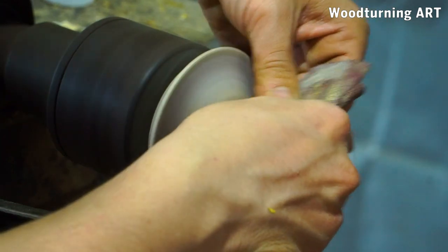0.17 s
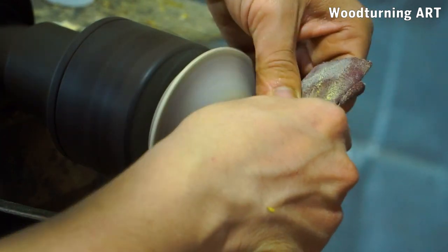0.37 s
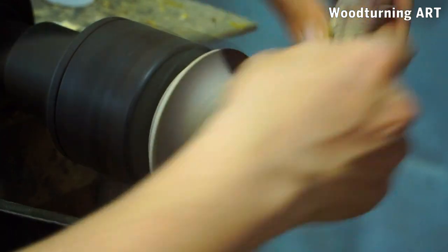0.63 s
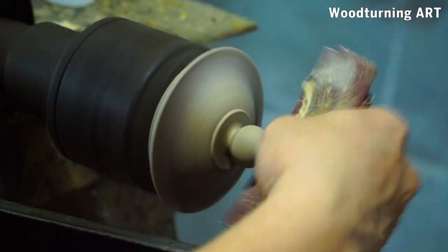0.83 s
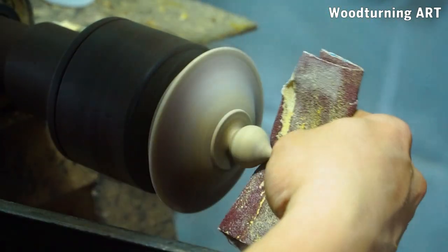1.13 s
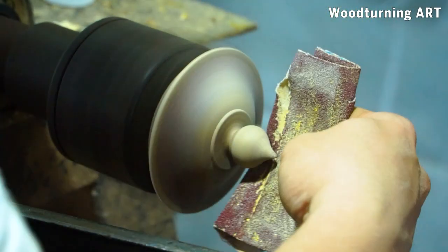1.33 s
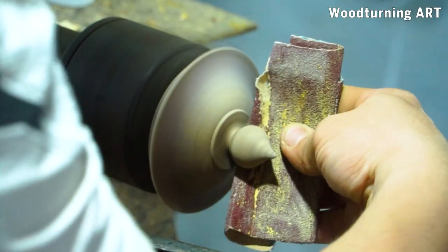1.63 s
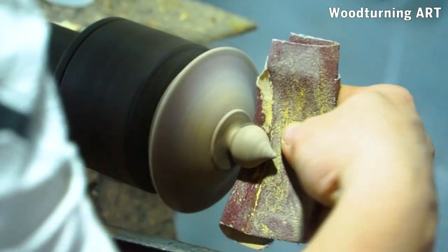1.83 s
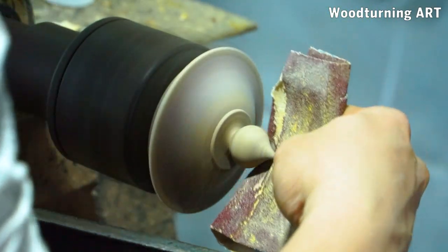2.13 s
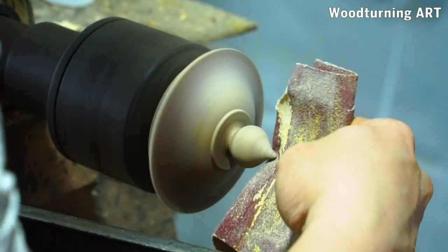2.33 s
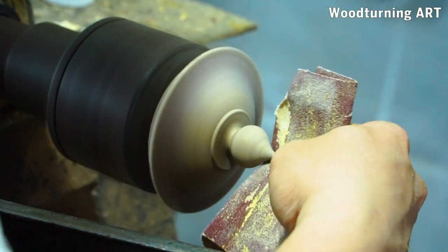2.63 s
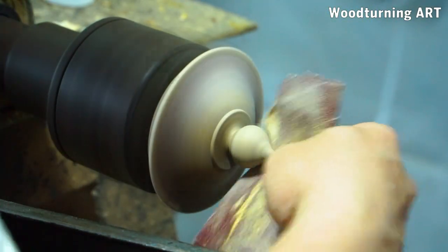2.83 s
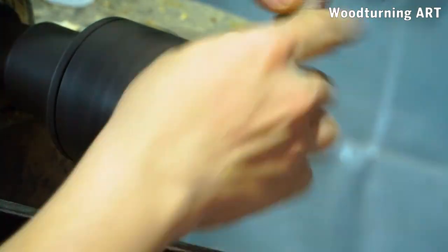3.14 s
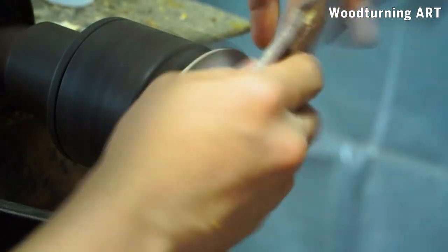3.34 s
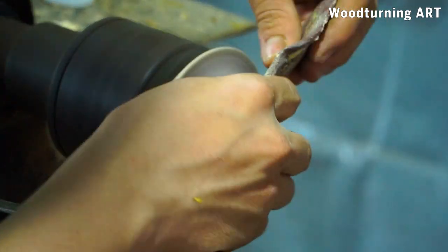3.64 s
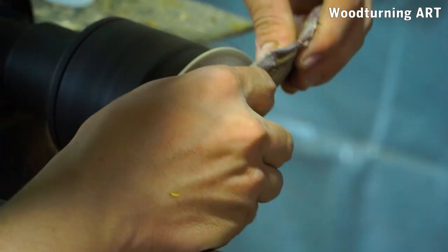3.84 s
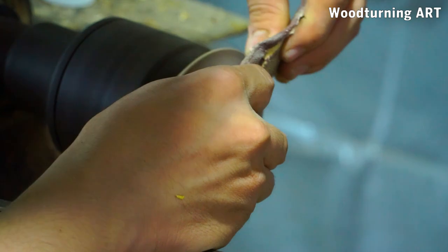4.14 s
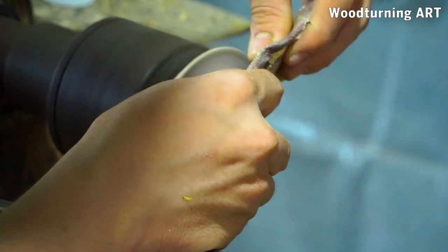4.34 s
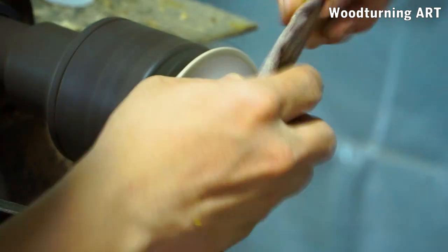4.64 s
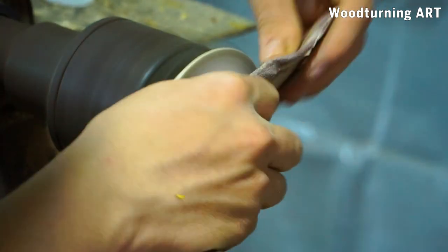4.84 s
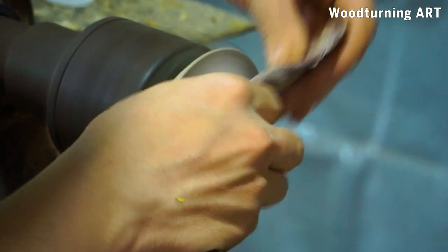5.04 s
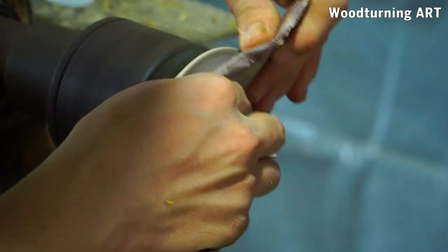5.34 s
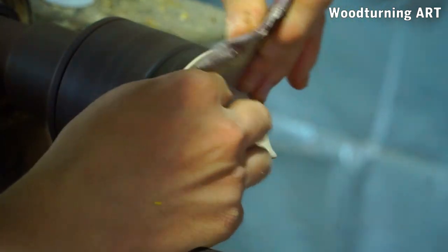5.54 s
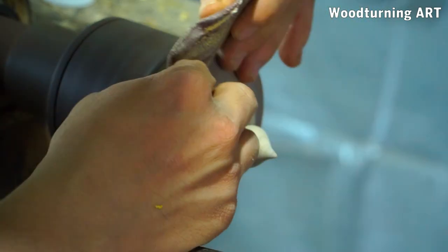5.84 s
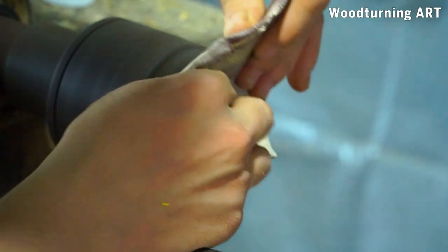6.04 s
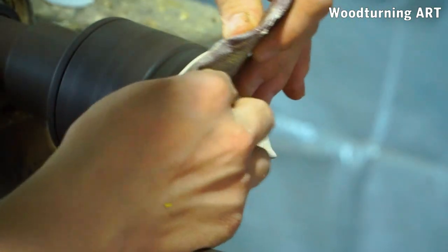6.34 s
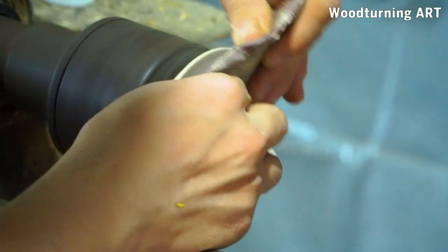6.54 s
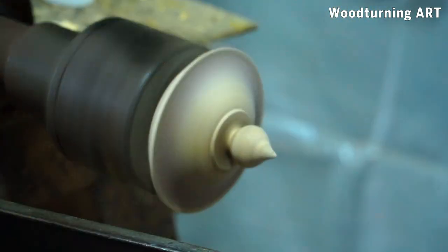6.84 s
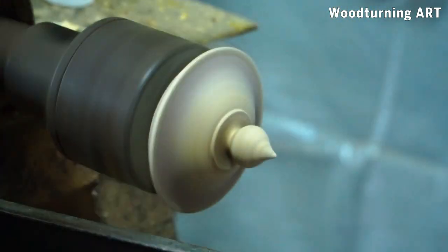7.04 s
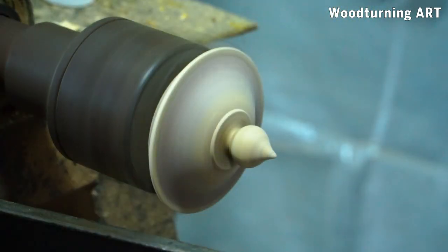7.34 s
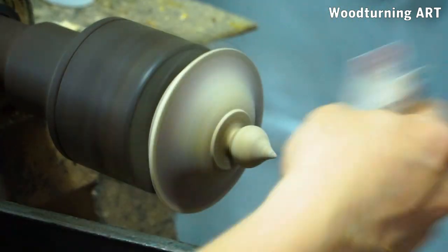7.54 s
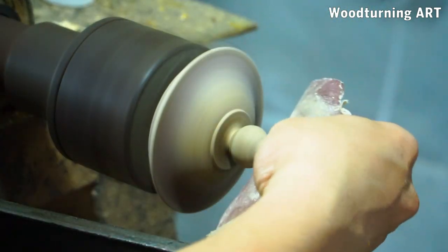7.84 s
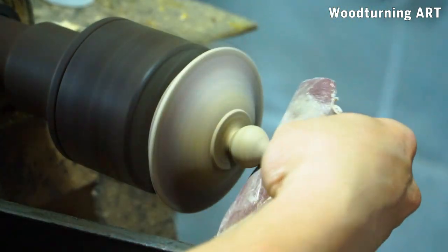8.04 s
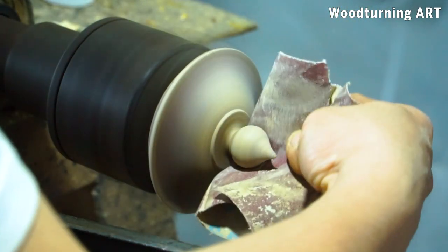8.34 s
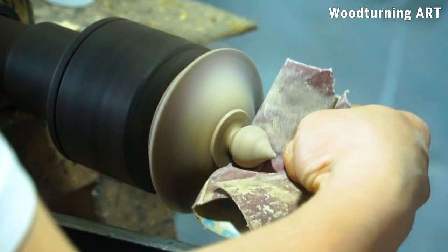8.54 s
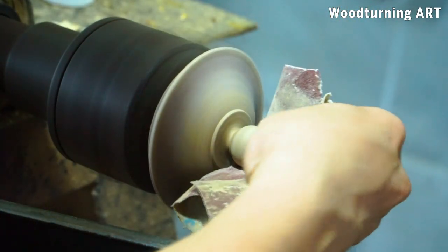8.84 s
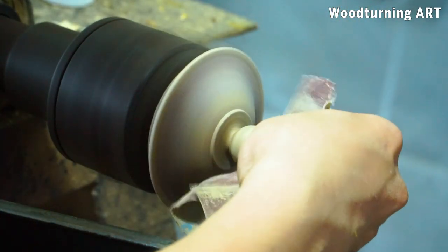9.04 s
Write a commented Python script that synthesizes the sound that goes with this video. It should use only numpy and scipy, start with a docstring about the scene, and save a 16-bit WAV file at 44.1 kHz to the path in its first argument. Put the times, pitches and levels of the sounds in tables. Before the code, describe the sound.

A wood lathe whines steadily for the whole nine seconds, with a slight flutter and a soft rush of fan and bearings. A faint low drone sits under it for the first few seconds. From the start, sandpaper rubs on the spinning wood in uneven presses of about half a second each, with two brief, soft groans from the wood before 0.5 seconds. Tiny high chirps of grit are scattered throughout, and dull scrapes come near 1, 3.3, 4 and 5.2 seconds. From about 5.2 to 6.8 seconds the sanding becomes a bright, sizzling hiss, flaring sharply at 5.9 and 6.7 seconds, where the overall level dips slightly. The paper then lifts, leaving mostly the lathe. A scrape near 7.6 seconds leads into more presses from 8 to 9 seconds. The workshop sound is close, with the hiss stronger on the left.

```python
"""Sandpaper rubs on spinning wood, which groans briefly, over the steady whine of a workshop lathe.
The motor's tones flutter with its belt, the fan and bearings rush, and the lathe's bed drones.
A hand presses the folded paper on again and again: grains rub and chirp, the stiff sheet rings,
its edge sizzles, and ridges in the wood scrape. The camera's gain control turns everything
down when the sizzle is sharpest."""
import sys
import numpy as np
from scipy import signal
from scipy.fft import rfft, irfft
from scipy.io import wavfile
from scipy.ndimage import uniform_filter1d

SR = 44100
rng = np.random.default_rng(int(sys.argv[2]) if len(sys.argv) > 2 else 0)


def bounce(signal):
    """Save signal as a 16-bit WAV file at the path given by the first command-line argument."""
    frames = np.transpose(np.atleast_2d(signal))
    limited = np.clip(frames, -1, 1)
    pcm = np.round(limited * 32767).astype(np.int16)
    wavfile.write(sys.argv[1], SR, pcm)


N = 404838
TIME, FREQS = np.arange(N) / SR, np.fft.rfftfreq(N, 1 / SR)


def gain_of(db):
    """Turns decibels into a number to multiply by."""
    return 10 ** (np.asarray(db) / 20)


def unit_level(x):
    """Scales a sound to an average (rms) level of 1."""
    return x / np.sqrt(np.mean(x ** 2) + 1e-20)


def over_time(rows):
    """Joins (time, value) points with straight lines."""
    return np.interp(TIME, *np.transpose(rows))


def over_frequency(rows):
    """Spreads each column of a frequency table over all frequencies."""
    hz, *columns = np.transpose(rows)
    return [np.interp(np.log(FREQS + 1), np.log(hz), column) for column in columns]


def resonances(rows):
    """A filter with a hump at each pitch where an object likes to ring."""
    return sum(gain_of(db) * np.minimum(FREQS / hz, 1) / (1 + (2 * (FREQS - hz) / width) ** 2)
               for hz, width, db in rows)


def filtered(x, gain):
    """Gives each frequency of a sound its own gain."""
    return irfft(rfft(x) * gain, N)


def shaken(rows):
    """The sound of resonances shaken at random."""
    return unit_level(filtered(rng.standard_normal(N), resonances(rows)))


def swells(rows):
    """A volume curve that rises and fades around each listed moment."""
    return sum(gain_of(db) * np.exp(-(2 * (TIME - s) / length) ** 2) for s, db, length in rows)


def wander(rate_hz):
    """A curve that drifts up and down at random."""
    steps = rng.standard_normal(4096)
    return unit_level(np.interp(TIME * 2 * rate_hz, np.arange(len(steps)), steps))


def sine(hz):
    """A sine wave that starts anywhere in its cycle."""
    return np.sin(2 * np.pi * (hz * TIME + rng.random()))


# Tone colour of the fan and bearings: (frequency [Hz], level [dB per Hz])
RUSH_COLOUR = [(25, -94.5), (70, -100), (130, -88), (330, -70), (650, -65), (1000, -61.5), (1300, -56),
               (1900, -60), (2650, -60), (3150, -61), (4150, -59.5), (4700, -64.5), (8100, -68),
               (9300, -73), (16000, -72.5)]
def fan_and_bearings(throb_hz=150.4, shaft_hz=37.6, swell_db=0.71):
    """Rushing noise pulses with the motor's throb and each turn of its shaft."""
    pulsing = 1 + 0.052 * sine(throb_hz) + 0.014 * sine(shaft_hz)
    drift = gain_of(swell_db * wander(10))
    noise = rng.standard_normal(N) * pulsing * drift
    return filtered(noise, gain_of(over_frequency(RUSH_COLOUR)[0])) * np.sqrt(SR / 2)


# How strongly the bed, the lathe's frame, drones: (time [s], level [dB])
BED_LEVEL = [(0, -52), (.6, -52.5), (1.1, -46), (1.4, -48), (1.7, -54), (3.2, -53.5), (6, -79), (9.18, -73)]
# Where the bed rings: (pitch [Hz], width [Hz], relative level [dB])
BED_RESONANCES = [(209, 10, -2), (252, 11, -0.5)]
def lathe_bed():
    """The shaking bed drones low; returns the sound and its volume curve."""
    shaking = gain_of(over_time(BED_LEVEL))
    return shaking * shaken(BED_RESONANCES), shaking


# Tones of the motor and drive: (pitch [Hz], base level [dB])
MOTOR_TONES = [(150.1, -64), (403.1, -55), (450.9, -44), (601.6, -42), (638.6, -54), (752, -49),
               (1045, -48), (1052.4, -46), (1119.1, -37.5), (1171.5, -46), (1195.1, -45), (1232.1, -43),
               (1269.8, -27.5), (1306.8, -45), (1339.1, -43), (1382.8, -45), (1419.8, -30.3), (1570.6, -43),
               (1649.3, -45), (1720.6, -41.5), (2017, -44), (2216.6, -45), (2254.3, -47), (2619.6, -37)]
# Motor speed, sagging under load: (time [s], change [%])
MOTOR_SPEED = [(0, -.02), (3, .02), (5.3, 0), (5.8, -.17), (6.5, -.1), (7.1, .03), (8.2, 0), (9.2, -.04)]
def motor_whine(bed_shaking, belt_hz=6.75, boost_db=3.2, full_shaking_db=-46):
    """Each lap of the belt bends the tones' pitch and level; the loudest grows as the bed shakes."""
    motor_time = np.cumsum(1 + over_time(MOTOR_SPEED) / 100) / SR
    flutter = 0.3 * sine(belt_hz) + 0.15 * sine(2 * belt_hz)  # radians at the loudest tone
    loudest_hz = max(MOTOR_TONES, key=lambda tone: tone[1])[0]
    boost = gain_of(boost_db * (bed_shaking / gain_of(full_shaking_db)) ** 2)
    out = np.zeros(N)
    for hz, db in MOTOR_TONES:
        phase = 2 * np.pi * (hz * motor_time + rng.random()) + flutter * hz / loudest_hz
        level = gain_of(db) * (boost if hz == loudest_hz else 1)
        waver = 1 + 0.055 * sine(belt_hz) + 0.06 * wander(6)
        out += level * waver * np.sin(phase)
    return np.sqrt(2) * out


# Groans of the wood: (time [s], peak level [dB], length [s])
WOOD_GROANS = [(.11, -32, 0.12), (.36, -36, 0.22)]
# Where the wood rings: (pitch [Hz], width [Hz], relative level [dB])
WOOD_RESONANCE = [(716, 55, 0)]
def wood_groans():
    """The wood groans at its own pitch under the first touch."""
    return swells(WOOD_GROANS) * shaken(WOOD_RESONANCE)


# Scrapes over ridges: (time [s], peak level [dB], length [s])
RIDGE_SCRAPES = [(1.03, -27, 0.36), (1.46, -24.5, 0.027), (3.05, -25, 0.033), (3.335, -26, 0.18),
                 (3.97, -26, 0.23), (5.09, -25, 0.15), (5.3, -24, 0.091), (6.64, -33, 0.3),
                 (7.57, -30, 0.46)]
# Their tone colour: (frequency [Hz], width [Hz], relative level [dB])
SCRAPE_COLOUR = [(1760, 1900, -4), (3540, 1550, -7.5)]
def ridge_scrapes():
    """A dull scrape swells as the paper meets a ridge in the wood."""
    return swells(RIDGE_SCRAPES) * shaken(SCRAPE_COLOUR)


# Short gritty chirps: (time [s], level [dB], pitch [Hz], fade time [s])
GRAIN_CHIRPS = [(0.275, -23, 8260, 0.011), (.351, -23, 12500, .0064), (.79, -22.5, 11100, 0.0092),
                (.835, -23, 6810, 0.011), (1.152, -21.5, 8480, .007), (2.096, -25, 8700, .012),
                (2.344, -23.5, 7110, .009), (2.555, -23, 8230, 0.017), (2.72, -25, 8360, .01),
                (2.865, -25, 8150, .0145), (3.212, -27, 8020, .012), (3.245, -26.5, 12300, .012),
                (3.36, -23.5, 7470, .012), (3.752, -24, 12500, .014), (4.187, -17.5, 12800, 0.0135),
                (4.548, -16, 7600, .007), (4.84, -29, 11500, 0.0104), (5.699, -20, 8490, .008),
                (6.24, -21, 8470, .009), (7.343, -21, 6870, 0.0077), (7.47, -20.5, 7550, 0.01),
                (8.199, -28, 8000, .04), (8.315, -22, 7500, 0.01), (8.435, -20.5, 8100, 0.0115),
                (8.9, -18, 7550, 0.0061), (8.936, -24, 11400, 0.022), (9.099, -25.5, 11500, .0074)]
def grain_chirps(rise_s=0.00065, fuzz_share=0.16, sink_share=0.06):
    """A catching grain makes a fuzzy squeak that sinks in pitch, plus a bright scratch."""
    out, t = np.zeros(N + SR), np.arange(SR // 10) / SR
    for start, db, hz, fade_s in GRAIN_CHIRPS:
        rise, fade = 1 - np.exp(-t / rise_s), np.exp(-t / fade_s)
        real, imaginary, hiss = rng.standard_normal((3, len(t)))
        pole = np.exp(-np.pi * fuzz_share * hz / SR)
        fuzz = signal.lfilter([1], np.poly([pole, pole]), real + 1j * imaginary)  # blurs the pitch
        cycles = np.cumsum(hz * (1 + sink_share * (2 * fade - 1))) / SR
        squeak = unit_level((fuzz * np.exp(2j * np.pi * cycles)).real)
        scratch = 0.61 * unit_level(np.gradient(hiss))
        out[round(start * SR):][:len(t)] += gain_of(db) * (squeak + scratch) * rise * fade
    return out[:N]


def grit(colour, per_s, spread_db, flicker_db, flicker_hz):
    """Grains of uneven size strike the wood, in clumps as the contact shifts."""
    sizes = gain_of(spread_db * np.minimum(rng.exponential(1, N), 4))
    strikes = rng.standard_normal(N) * sizes * (rng.random(N) < per_s / SR)
    return unit_level(filtered(strikes, colour) * gain_of(flicker_db * wander(flicker_hz)))


# Tone colour of the sizzle: (frequency [Hz], relative level [dB])
SIZZLE_COLOUR = [(500, -51), (3000, -15), (6000, -8.5), (9000, -2.5), (12000, 0.5), (13700, 1.2),
                 (15000, -1), (15800, 1)]
# Flares as the edge bites or creases: (time [s], peak level [dB], length [s])
EDGE_FLARES = [(1.35, -28, .16), (2.86, -30, .08), (5.53, -23, .14), (5.86, -13.5, 0.17),
               (6.71, -13.5, 0.1), (7.4, -33, 0.33), (8.31, -24.5, 0.12), (8.49, -23, 0.27)]
def edge_sizzle(drive, tick_db=-37, ticks_per_s=13, tick_fade_s=0.013):
    """The paper's edge sizzles and flares; faint stray ticks of the same colour come throughout."""
    colour = gain_of(over_frequency(SIZZLE_COLOUR)[0])
    sizzle = grit(colour, per_s=20000, spread_db=0.5, flicker_db=1, flicker_hz=40)
    sizes = gain_of(2 * np.minimum(rng.exponential(1, N), 3))
    starts = rng.random(N) < ticks_per_s / SR
    puffs = signal.lfilter([1], [1, -np.exp(-1 / (tick_fade_s * SR))], sizes * starts)
    ticks = unit_level(filtered(puffs * rng.standard_normal(N), colour))
    return np.hypot(drive, swells(EDGE_FLARES)) * sizzle + gain_of(tick_db) * ticks


# Where the sheet rings: (pitch [Hz], width [Hz], relative level [dB])
SHEET_RESONANCES = [(8130, 500, 0), (6100, 380, -4), (5000, 250, -7)]
def sheet_ring():
    """Grain strikes make the loose part of the stiff sheet ring."""
    return grit(resonances(SHEET_RESONANCES), per_s=12000, spread_db=0.5, flicker_db=3.5, flicker_hz=35.07)


# Tone colour of the hiss: (frequency [Hz], width [Hz], relative level [dB])
HISS_COLOUR = [(7200, 3400, 1), (9500, 1700, -0.5)]
def flat_hiss(level_db=-1.5):
    """Paper lying flat on the broad wooden disc hisses."""
    return gain_of(level_db) * shaken(HISS_COLOUR)


# Tone colour of the rub: (frequency [Hz], relative level [dB])
RUB_COLOUR = [(100, -27), (400, -10), (900, 6), (1700, 1.5), (4000, 0), (5000, 4.5), (7500, 2.5),
              (10000, -5), (16000, -8)]
def face_rub():
    """The paper's gritty face rubs on the turning wood."""
    colour = gain_of(over_frequency(RUB_COLOUR)[0])
    return grit(colour, per_s=16000, spread_db=1.5, flicker_db=2, flicker_hz=35.2)


# Presses of the paper on the wood: (start [s], length [s], force [dB], ring relative to force [dB],
# sizzle relative to force [dB], share lying flat [0-1])
HAND_PRESSES = [(-.1, .42, -30.5, 0.5, -5, 0), (0.296, 0.46, -32.5, -5, -11, 0),
                (0.78, 0.7, -26.5, -8, -5, 0), (1.24, 0.48, -24.5, -9, -2, 0),
                (1.755, .54, -28.5, -2.5, -0.5, 0), (2.7, 0.33, -30, -3.5, -8.5, 0),
                (3.017, .35, -31, -16, -10.5, 0), (3.525, 0.42, -29.5, -16, -11, 0),
                (3.845, .79, -25.5, -21, -3.5, 0.6), (4.622, 0.98, -30, -18, -10, 0),
                (5.223, 0.61, -30.5, -10, 4, 1), (5.87, 0.78, -29, -8, 5, 0.75),
                (7.675, 0.14, -35, -3, -13.5, 0), (8.002, 0.56, -28.5, -4, -7, .1),
                (8.58, 0.42, -30, -4.5, -1, 0)]
def hand_sanding(lean_s=0.047, lift_s=0.063, arch_db=4, tremor_db=0.8):
    """An unsteady hand leans in, presses hardest midway and lifts; returns the sound and the force."""
    powers = np.zeros((4, N))
    for start, length, force_db, ring_db, sizzle_db, flat_share in HAND_PRESSES:
        t = TIME - start
        contact = np.clip(t / lean_s, 0, 1) * np.clip(1 - (t - length) / lift_s, 0, 1)
        easing_db = arch_db * np.clip(2 * t / length - 1, -1, 1) ** 2
        shares = [1, gain_of(ring_db), gain_of(sizzle_db), flat_share]
        powers += np.outer(np.square(shares), contact * gain_of(force_db - easing_db) ** 2)
    force, ringing, sizzling, flat = np.sqrt(powers) * gain_of(tremor_db * wander(5))
    paper = force * face_rub() + ringing * sheet_ring() + edge_sizzle(sizzling) + flat * flat_hiss()
    return paper, force


def scattered(x):
    """Bouncing around the workshop keeps a sound's colour but jumbles its waves."""
    slices = signal.stft(x, nperseg=512)[2]
    jumbled = slices * np.exp(2j * np.pi * rng.random(slices.shape))
    return np.std(x) * unit_level(signal.istft(jumbled)[1][:N])


# Right microphone against left: (frequency [Hz], level [dB], likeness [0-1], phase lead [radians])
RIGHT_MICROPHONE = [(40, -13, 0.8, 0.27), (130, -0.5, 0.94, 0.3), (500, -1, 1, 1.47),
                    (1130, -1.5, 0.94, 1.805), (1980, -3, 0.95, 1.84), (4120, -5.5, 0.9, 1.55),
                    (7950, -10, 0.77, 1.56), (14000, -11.5, 0.4, 1.6)]
def microphones(tones, noise):
    """The left one faces the work; the right is shaded and hears more scattered noise."""
    right_db, likeness, lead = over_frequency(RIGHT_MICROPHONE)
    shade = gain_of(right_db)
    left = rfft(tones + noise)
    direct = likeness * np.exp(1j * lead) * left
    bounced = np.sqrt(1 - likeness ** 2) * rfft(scattered(noise))
    right = shade * (direct + bounced)
    average_gain = np.sqrt(1 + shade ** 2 + 2 * shade * likeness * np.cos(lead)) / 2
    return irfft(np.array([left, right]) / average_gain, N)


def scene(idle_db=-0.1, load_db=0.77, full_force_db=-23):
    """Lathe and sanding together; motor and fan get louder the harder the paper is pressed."""
    paper, force = hand_sanding()
    load = gain_of(idle_db + load_db * force / gain_of(full_force_db))
    drone, bed_shaking = lathe_bed()
    lathe = load * fan_and_bearings() + drone
    handwork = wood_groans() + ridge_scrapes() + grain_chirps() + paper
    return microphones(load * motor_whine(bed_shaking), lathe + handwork)


def record(dry, threshold_db=-18, slope=0.83, held_share=0.5, recover_db_per_s=4, top_hz=15880):
    """Loud treble turns the volume down at once; part of it comes back only slowly."""
    treble = filtered(dry[0], (FREQS > 9000) & (FREQS < top_hz))
    treble_db = 10 * np.log10(abs(uniform_filter1d(treble ** 2, size=900)) + 1e-12)
    quick_cut_db = slope * np.maximum(treble_db - threshold_db, 0)
    recovery_db = recover_db_per_s * TIME
    slow_cut_db = np.maximum.accumulate(held_share * quick_cut_db + recovery_db) - recovery_db
    turned_down = dry * gain_of(-np.maximum(quick_cut_db, slow_cut_db))
    capped = np.clip(turned_down, -0.88, 0.88)
    low_pass = signal.firwin(601, top_hz, window=("kaiser", 8), fs=SR)  # removes the highest treble
    return signal.oaconvolve(capped, low_pass[None], "same")


dry = scene()
out = record(dry)
bounce(out)
```